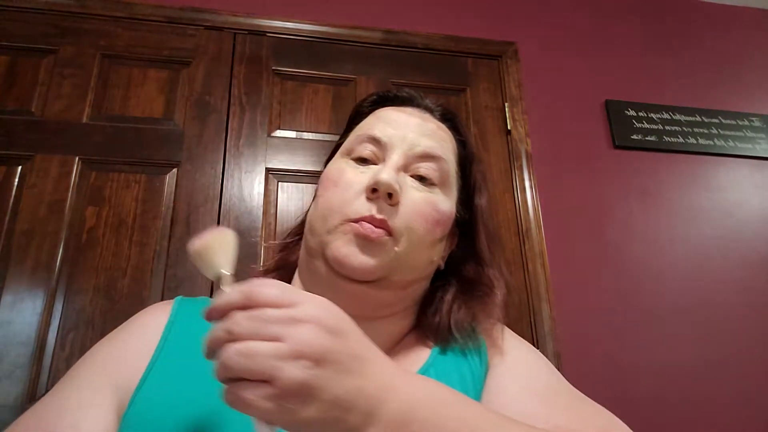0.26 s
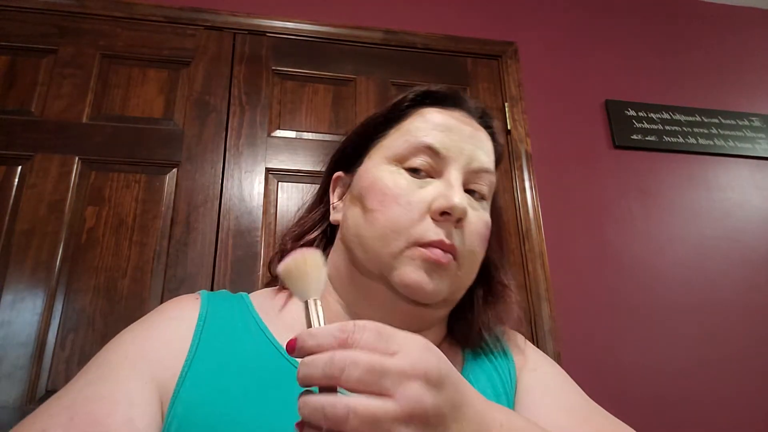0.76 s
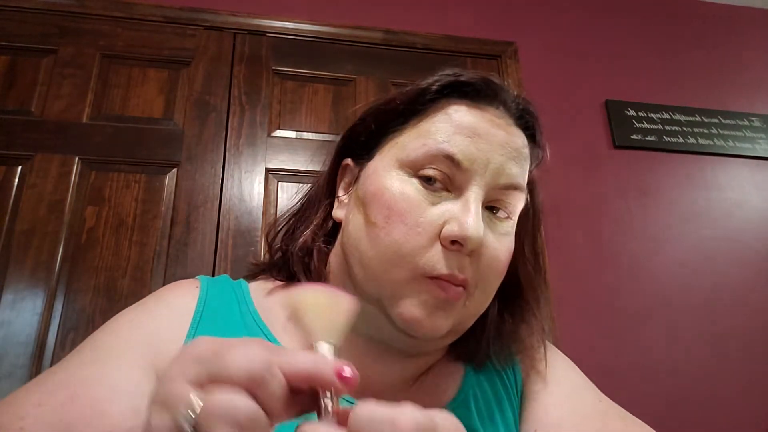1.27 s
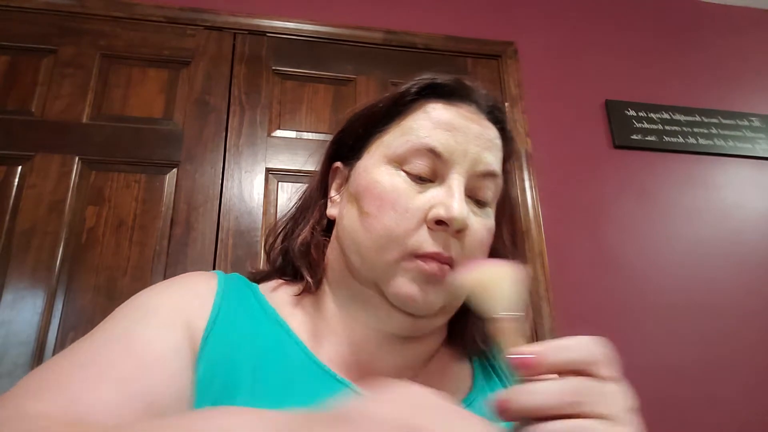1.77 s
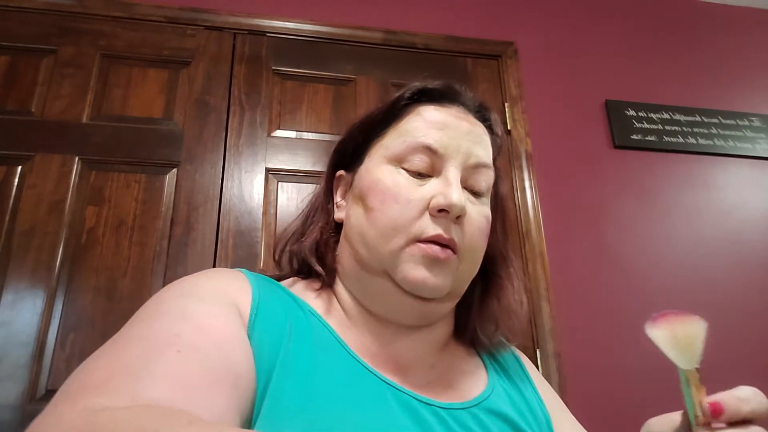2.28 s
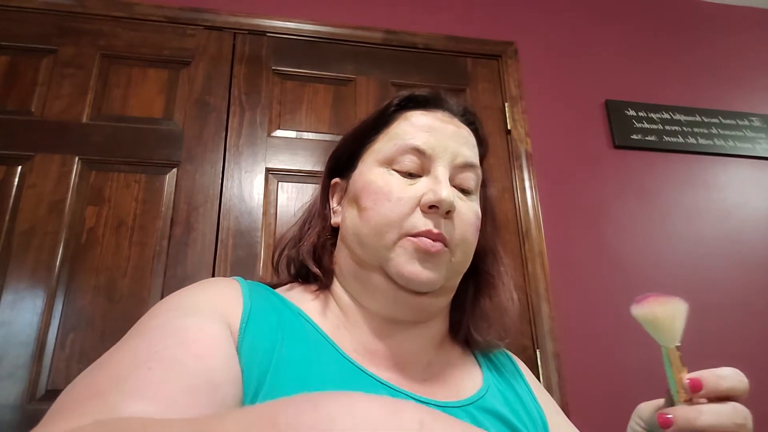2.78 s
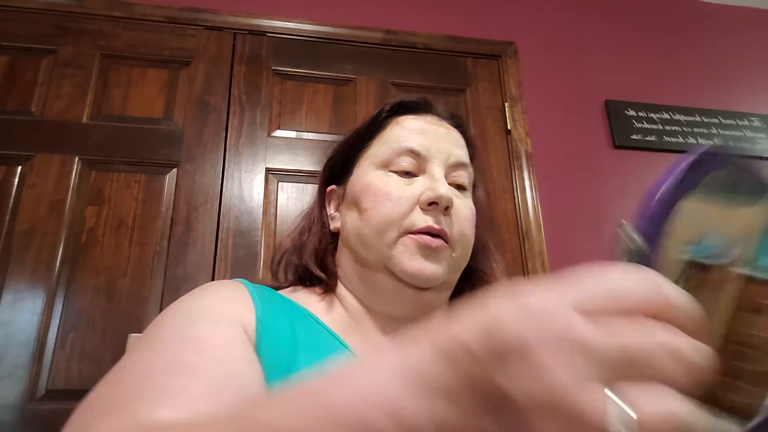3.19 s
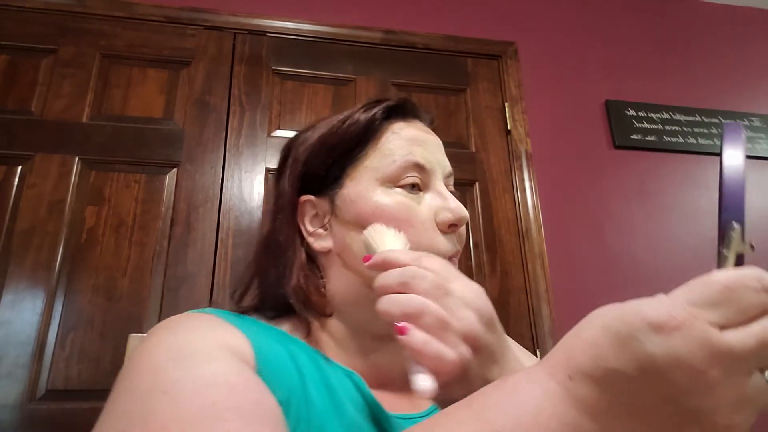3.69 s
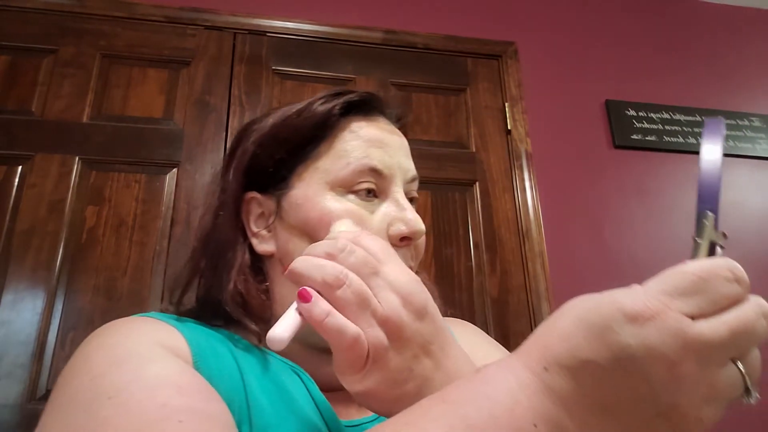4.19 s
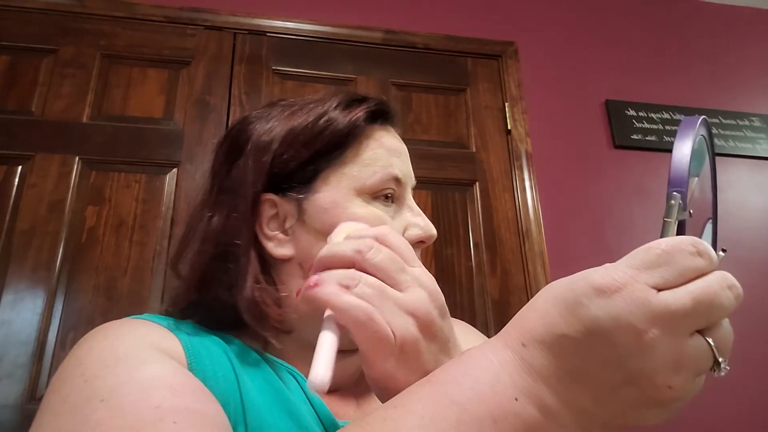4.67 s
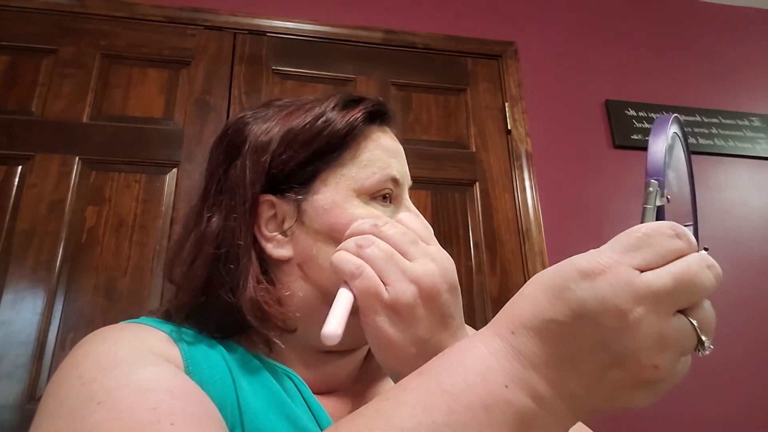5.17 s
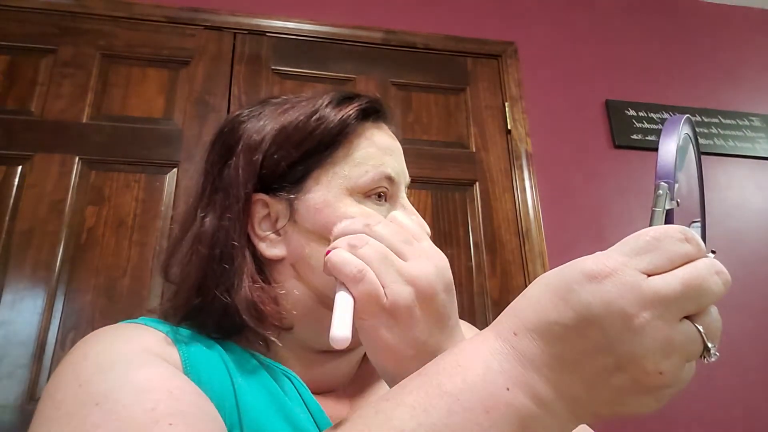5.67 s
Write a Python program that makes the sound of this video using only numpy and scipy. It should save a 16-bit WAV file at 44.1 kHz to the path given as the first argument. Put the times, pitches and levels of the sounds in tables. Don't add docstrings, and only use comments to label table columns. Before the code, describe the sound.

Small cosmetic items click and knock on wood, a hand mirror scrapes and thuds, then soft rustling remains above a low steady hum.

```python
import sys
import numpy as np
from scipy import signal
from scipy.fft import rfft, irfft, next_fast_len
from scipy.io import wavfile
from scipy.ndimage import uniform_filter1d

SR = 44100
rng = np.random.default_rng(int(sys.argv[2]) if len(sys.argv) > 2 else 0)


def undo_db(level):
    steps = np.asarray(level, float) / 20
    return 10 ** steps


def store_wav(level_fs):
    pcm = np.round(np.clip(np.atleast_2d(level_fs), -1, 1) * 32767)
    wavfile.write(sys.argv[1], SR, pcm.T.astype(np.int16))


N = 261954
CONTACT_S = 0.0013

# frequency [Hz], width [Hz], level [dB].
FRAME_MODES = [(1390, 110, 0), (1540, 130, -2), (1700, 150, -6), (2450, 130, -5), (2680, 220, -8)]


def rms_one(x):
    return x / np.sqrt(np.mean(x ** 2) + 1e-20)


def in_time(rows):
    s, *columns = np.transpose(rows)
    lasts = s[-1] > 5
    t = np.arange(N) / SR
    return [np.interp(t, s, c, left=-150, right=c[-1] if lasts else -150) for c in columns]


def at_hz(points, hz):
    points_hz, values = np.transpose(points)
    return np.interp(np.log(hz), np.log(points_hz), values)


def drift(rate_hz):
    r = np.exp(-80 * np.pi * rate_hz / SR)
    white = rng.standard_normal(N // 40 + 2002)
    slow = signal.lfilter([1], [1, -2 * r, r * r], white)[2000:]
    return np.interp(np.arange(N) / 40, np.arange(len(slow)), rms_one(slow))


def ring(clicks, hz, t60_s):
    r = undo_db(-60 / (t60_s * SR))
    w = 2 * np.pi * hz / SR
    return signal.lfilter([0, np.sin(w)], [1, -2 * r * np.cos(w), r * r], clicks + 1e-18)


def resonance(x, hz, width_hz):
    r = np.exp(-np.pi * width_hz / SR)
    zeros = (1 - r * r) / 2 * np.array([1, 0, -1])
    return signal.lfilter(zeros, [1, -2 * r * np.cos(2 * np.pi * hz / SR), r * r], x)


def butter(x, order, hz, kind="low"):
    return signal.sosfilt(signal.butter(order, hz, kind, fs=SR, output="sos"), x)


def clicks_at(times_s, sizes):
    out = np.zeros(N)
    np.add.at(out, (np.asarray(times_s) * SR).astype(int), sizes)
    return out


def grains(per_s, spread_db):
    sizes = undo_db(spread_db * np.minimum(rng.exponential(1, N), 5)) * rng.choice([-1, 1], N)
    return sizes * (rng.random(N) < per_s / SR)


def coloured(x, spectrum):
    size = next_fast_len(N)
    hz = np.arange(size // 2 + 1) * SR / size + 1
    inside = (hz > spectrum[0][0]) & (hz < spectrum[-1][0])
    gain = undo_db(at_hz(spectrum, hz)) * inside
    return rms_one(irfft(rfft(x, size) * gain, size)[..., :N])


def stereo_bands(size, likeness):
    edges_hz = 28 * 2 ** np.arange(0, 9.6, .5)
    white = rng.standard_normal((2, 2, size))
    for k, (low_hz, high_hz) in enumerate(zip(edges_hz, edges_hz[1:])):
        mid, side = butter(white[k % 2], 2, [low_hz, high_hz], "band")
        hz = np.sqrt(low_hz * high_hz)
        alike = np.clip(at_hz(likeness, hz), -1, 1)
        yield hz, np.sqrt(1 + alike) * mid + np.sqrt(1 - alike) * side * [[1], [-1]]


def hum():
    # time [s], level [dB], balance toward the upper tone [dB].
    flow_rows = [(0, -49.5, -1.5), (.3, -49.5, -5), (.55, -48, -2.5), (1, -50, -8), (1.3, -53, -5),
                 (2, -54, -2), (2.25, -47, -5), (2.65, -61, 6.5), (3.1, -48.5, -8.5), (3.4, -53, -8.5),
                 (3.85, -55, -3.5), (4.2, -50, -5.5), (4.4, -53, -6), (4.85, -45.5, -9), (5.13, -50.5, -3),
                 (5.4, -48, -3.5), (5.94, -50.5, -2)]
    # frequency [Hz], waver [Hz].
    duct_tones = [(236.5, 5), (393, 0.23)]
    # frequency [Hz], width [Hz], level [dB].
    faint_tones = [(60.6, 2.3, -77.5), (126, 1.1, -68), (156, 2.1, -74), (291.5, 2.3, -65),
                   (465, 1.2, -64.5), (780, 2.6, -68.5)]
    out = np.zeros((2, N))
    flow_db, balance_db = in_time(flow_rows)
    for (hz, waver_hz), level_db, pan_db in zip(duct_tones, [flow_db, flow_db + balance_db], [-1.2, 1.2]):
        phase = 2 * np.pi * np.cumsum(hz + waver_hz * drift(5.2)) / SR
        gain = undo_db(level_db + 2.5 + 2.7 * drift(36.0))
        out += gain * np.sin(phase) * undo_db([[pan_db], [-pan_db]])
    for hz, width_hz, level_db in faint_tones:
        out += undo_db(level_db) * rms_one(resonance(rng.standard_normal(N), hz, width_hz))
    return out


def duct():
    # frequency [Hz], density [dB per Hz].
    air_spectrum = [(25, -49.5), (50, -22), (100, -21), (180, -24.5), (300, -6.5), (450, -18),
                    (700, -22), (1000, -47.5),
                    (1500, -48), (3000, -68.5), (4200, -76), (5200, -66), (6300, -74.5), (8000, -79.5),
                       (15500, -60)]
    # frequency [Hz], left-right likeness [-1 to 1].
    air_likeness = [(60, 0.97), (130, 0.72), (290, 0.91), (640, 0.71), (1410, -1.7), (3100, 0.14),
                    (6820, -0.34), (15000, 0.96)]
    spectrum = air_spectrum
    together = drift(0.99)
    air = 0
    for hz, band in stereo_bands(N, air_likeness):
        flicker_db = (3.0 * together + 0.84 * drift(8.)) / (1 + hz / 3800.0)
        air = air + undo_db(at_hz(spectrum, hz) + flicker_db) * band
    return undo_db(-55) * rms_one(air)


def strokes():
    # start [s], length [s], level [dB], fineness [dB].
    stroke_rows = [(0, 0.86, -72.5, -3.5), (0.074, 0.092, -72.5, -6), (0.335, 0.028, -72.5, 6.5),
                   (0.54, 0.16, -71.5, -10), (0.725, 0.091, -75.5, 6.5), (0.984, 0.17, -66, -28),
                   (1.517, 0.083, -82.5, -3.5), (1.618, 0.23, -69, -8.5), (1.89, 0.44, -68.5, -11),
                   (2.46, 0.038, -45, -29), (2.569, 0.19, -50.5, -11.5), (2.811, 0.17, -52, -19),
                   (2.969, 0.24, -63, -12.5), (3.192, 0.18, -69.5, -9), (3.387, 0.074, -67.5, -5),
                   (3.479, 0.042, -72, -19), (3.525, 0.058, -76, -11), (4.061, 0.31, -81.5, -18),
                   (4.745, .2, -82, -5.5)]
    rise_s, fall_s = 0.033, 0.016
    rub_db, rub_follows = -54, 0.69
    resting = (-1, 9, -80.5, -7)
    t = np.arange(N) / SR
    power = 0
    for s, length_s, db, fine_db in [resting, *stroke_rows]:
        away = np.maximum((s - t) / rise_s, (t - s - length_s) / fall_s).clip(0)
        zones_db = [[rub_db + rub_follows * (db + 68.5)], [db], [db + fine_db]]
        power = power + np.exp(-2 * away) * undo_db(zones_db) ** 2
    return np.sqrt(power)


def dabs():
    # time [s], level [dB], length [s], centre [Hz].
    dab_rows = [(3.152, -60.5, 0.0602, 1900), (0.75, -73.5, 0.038, 900), (2.4, -52.5, 0.068, 620),
                (5.1, -76.5, 0.029, 730), (4.6, -68, 0.034, 700), (5.1, -57, 0.054, 530),
                (3.4, -75, 0.069, 690), (4.3, -51, 0.027, 390), (4.878, -54, 0.029, 434),
                (6.3, -61, 0.006, 800), (5.5, -66, 0.0042, 810), (1.83, -71.5, 0.17, 1870),
                (4.143, -78, 0.2, 1600), (6.4, -78, 0.056, 1830), (2.9, -52.5, 0.0036, 570),
                (5.55, -70.5, .3, 670)]
    t = np.arange(N) / SR
    out = np.zeros(N)
    fibres = grains(per_s=12000.0, spread_db=4.0)
    for s, level_db, length_s, hz in dab_rows:
        sound = fibres
        for _ in range(4):
            sound = resonance(sound, hz, hz)
        out += undo_db(level_db) * np.exp(-((t - s) / length_s) ** 2) * rms_one(sound)
    return out


def rustle():
    # frequency [Hz], density [dB per Hz].
    rub_spectrum = [(300, 11.5), (600, 4.5), (1000, -7.5), (1600, -12), (2600, -21), (3600, -39)]
    # frequency [Hz], density [dB per Hz].
    swish_spectrum = [(2500, -1.5), (4000, -7), (5200, 7), (6500, -2.5), (8000, -26)]
    # frequency [Hz], density [dB per Hz].
    hiss_spectrum = [(7000, -21.5), (8500, -5.5), (10500, -4), (12300, 2.5), (14000, -23), (15500, -8)]
    fibres = np.array([grains(per_s=36000.0, spread_db=4.5) for _ in "LR"])
    shared = grains(per_s=4800.0, spread_db=-0.5)
    rub_gain, swish_gain, hiss_gain = strokes()
    rub_flutter_db, swish_flutter_db, hiss_flutter_db = [1.3 * drift(15.) for _ in range(3)]
    rub = coloured(shared + 0.12 * fibres, rub_spectrum) * rub_gain * undo_db(-2.5 + rub_flutter_db)
    swish = coloured(fibres, swish_spectrum) * swish_gain * undo_db(-4.0 + swish_flutter_db)
    hiss = coloured(fibres, hiss_spectrum) * hiss_gain * undo_db(-3.5 + hiss_flutter_db)
    return rub + swish + hiss + dabs()


def knock_levels():
    case_rows = [(0.481, -44, 20.5, -12.5), (0.5197, -50.5, 15.5, -16), (0.561, -51.5, 24.5, -0.5),
                 (0.8833, -15.5, 4.5, 1.5), (0.898, -32, 3, -13), (0.9049, -7.5, -12.5, -8),
                 (.922, -23.5, -10, -16), (0.949, -25.5, 4.5, -23), (.965, -30, 2, -3),
                 (1.955, -47.5, 19.5, -8.5), (1.9751, -29, -2, -12.5), (2.088, -21, -4, -8),
                 (2.109, -35, -4, -10), (2.159, -41.5, -3, -3.5), (2.184, -48.5, 7, 2)]
    mirror_rows = [
        (2.567, -28, -1.5, -15),
        (2.589, -29, -11.5, -13),
        (2.628, -33, -3.5, -17.5),
        (2.642, -32, 0.5, -9.5),
        (2.686, -29, -10.5, -16.5),
        (2.7979, -10, -3, -2),
        (2.842, -17.5, -3, -9.5),
        (2.884, -30, 1, -3),
        (3.003, -40.5, -5, 0.5),
        (3.091, -60.5, 35, -16),
    ]
    hinge_rows = [(2.342, -42, 14.5, 5.5), (2.408, -44, 14.5, 7), (2.42, -41, 13, -9), (2.434, -38, 8, -23),
                  (2.449, -30, -24, 2), (2.545, -32, 10, 1), (2.71, -28, 1, -0.5), (3.044, -49.5, 8, 0),
                  (3.328, -50.5, -2, 1.5), (3.3707, -40, -18, 8.5), (3.427, -47, -22, -25)]
    # hollow body over case [dB], crack over edge click [dB].
    builds = [(3, -22.5), (8.5, -22), (-3.5, -11)]
    rows = []
    for table_rows, (hollow_db, crack_db) in zip((case_rows, mirror_rows, hinge_rows), builds):
        for s, db, weight_db, hard_db in table_rows:
            body_db = db + hollow_db + 0.59 * weight_db
            rows.append((s, db, db + weight_db, body_db, db + hard_db, db + hard_db + crack_db))
    return np.array(sorted(rows))


def boom(times_s, levels_db):
    hz = 130
    return resonance(ring(clicks_at(times_s, undo_db(levels_db)), hz, t60_s=.5), hz, width_hz=13)


def knocks():
    # lowest mode [Hz], highest mode [Hz], t60 [s].
    part_modes = [
        (1000, 3600, .013),
        (165, 440, .026),
        (420, 1350, .016),
        (2800, 7600, .007),
        (6500, 14000, .006),
    ]
    rows = knock_levels()
    out = np.zeros(N)
    t = np.arange(SR // 20) / SR
    luck = rng.random((len(rows), 4, len(part_modes), 8))
    for (s, *levels_db), (pitch, sign, size, wait) in zip(rows, luck):
        sound = 0
        for k, (low_hz, high_hz, t60_s) in enumerate(part_modes):
            step = (np.arange(8) + pitch[k]) / 8
            hz = low_hz * (high_hz / low_hz) ** step
            sizes = np.sin(np.pi * step) * undo_db(5 * size[k]) * np.sign(sign[k] - .4)
            since = np.maximum(t - CONTACT_S * wait[k][:, None] ** 2, 0)
            build = 1 - np.exp(-since * low_hz * 1.5)
            tones = undo_db(-60 * since / t60_s) * build * np.sin(2 * np.pi * hz[:, None] * since)
            sound = sound + undo_db(levels_db[k] - 2.5) * (sizes @ tones)
        start = int(s * SR)
        out[start:start + len(t)] += sound
    s, case_db, table_db, edge_db = rows[:, [0, 1, 2, 4]].T
    out += ring(clicks_at(s + 0.00063, undo_db(case_db - 4.0)), 1670, t60_s=0.017)
    out += ring(clicks_at(s + 0.00042, undo_db(edge_db - 2.0)), 4900, t60_s=0.009)
    return out + boom(s, table_db - 17.0)


def snaps():
    rows = knock_levels()
    level_db = (rows[:, 1] + rows[:, 4]) / 2 - 4.5 + 10.5
    impact = clicks_at(rows[:, 0] + 0.00034, undo_db(level_db))
    return butter(impact, 2, [900, 6700], "band")


def notes():
    # time [s], peak [dB], frequency [Hz], t60 [s].
    note_rows = [(0.4829, -24.5, 592, 0.029), (.5203, -37, 780, .015), (0.482, -36.5, 1300, 0.026),
                 (.5605, -43, 590, 0.019), (0.5614, -25, 240, 0.056), (0.561, -57, 11000, 0.0038),
                 (0.8924, -21.5, 2390, 0.018), (0.899, -19.5, 597, 0.021), (0.899, -17.5, 1700, 0.013),
                 (0.9056, -12, 1800, 0.017), (.9052, -15.5, 762, 0.035), (.9052, -15, 6040, 0.0084),
                 (0.9075, -33, 11800, .005), (0.914, -17.5, 2440, 0.031), (0.9146, -26, 3060, .02),
                 (0.964, -32.5, 5070, 0.0065), (1.9565, -46, 380, 0.042), (1.974, -40.5, 476, 0.041),
                 (1.982, -35, 903, 0.054), (2.088, -24, 1905, 0.051), (2.088, -30, 870, 0.043),
                 (2.0879, -30.5, 1224, 0.07), (2.094, -29, 2530, 0.028), (2.097, -34, 5260, 0.019),
                 (2.106, -28, 758, 0.051), (2.158, -47, 10600, 0.0053), (2.159, -54, 4500, 0.011),
                 (2.3408, -38, 1500, 0.072), (2.3415, -36.5, 4700, 0.039), (2.7967, -12.5, 410, 0.043),
                 (2.798, -9, 1584, 0.026), (2.799, -18, 2970, 0.02), (2.803, -20.5, 902, .05),
                 (2.843, -18.5, 2515, 0.022), (2.845, -17, 1458, 0.037), (2.866, -29, 1490, 0.035),
                 (3.327, -48, 3000, 0.024), (3.371, -40.5, 5400, 0.034), (3.3697, -37.5, 6990, 0.018),
                 (3.3712, -54, 9800, 0.031), (3.3716, -50, 11970, 0.051), (3.371, -46.5, 2475, 0.051),
                 (3.426, -48, 2300, 0.015), (4.366, -54.5, 700, 0.028), (4.853, -45, 646, 0.021),
                 (2.7968, -13.5, 3440, 0.0088), (2.803, -17.5, 4770, 0.018), (2.797, -20, 211, 0.07),
                 (.9055, -21, 4100, .008), (0.894, -30, 5570, .012), (2.0995, -34, 560, 0.04),
                 (2.111, -30.5, 1325, 0.031),
                 (0.893, -25, 4000, 0.0066), (.948, -51, 12160, 0.01), (.9235, -40, 11800, 0.0067),
                 (.9235, -37.5, 8500, 0.0054), (.966, -47, 9400, 0.0055), (2.41, -42, 6300, .008),
                 (2.421, -48, 8500, .006), (2.46, -36, 7100, .01), (2.571, -35, 5700, 0.046),
                 (2.576, -42, 10600, 0.0061), (2.589, -49, 8500, .006), (2.648, -43, 7466, 0.0052),
                 (2.647, -35, 4020, 0.0069), (2.72, -42, 5500, .01), (2.72, -33, 11500, .008),
                 (3.043, -54, 11500, 0.0046), (3.13, -58, 4700, 0.046), (3.21, -63, 4780, 0.033),
                 (3.21, -57, 6800, .02), (2.685, -23, 1000, .015), (3.095, -35, 280, 0.032),
                 (.9065, -20, 1616, 0.023), (.907, -36, 12590, .012), (2.0885, -46, 11600, .02),
                 (2.0885, -46.5, 9000, 0.015), (3.372, -47, 4300, .02)]
    return sum(ring(clicks_at([s], [undo_db(db)]), hz, t60_s) for s, db, hz, t60_s in note_rows)


def bumps():
    # time [s], peak [dB], frequency [Hz].
    bump_rows = [(0.561, -22, 184), (0.887, -30, 83.4), (0.903, -49, 167.7), (1.957, -28, 126),
                 (0.616, -40, 62), (2.236, -46.5, 95), (2.454, -34, 62), (2.64, -33, 87),
                 (2.901, -32, 90.6), (2.437, -51, 199), (2.796, -52, 196.7), (3.091, -41, 131.8),
                 (3.16, -36, 138.6), (3.393, -38, 150.2), (3.719, -49.5, 108.5), (4.101, -32.5, 119.8),
                 (4.155, -32, 100.3), (4.271, -51.5, 88), (4.758, -59.5, 199.5), (4.878, -42.5, 156)]
    out = np.zeros(N)
    for s, peak_db, hz in bump_rows:
        out += ring(clicks_at([s], [undo_db(peak_db - 3.0)]), hz, 5.3 / hz)
    s, peak_db, hz = np.transpose(bump_rows)
    out += boom(s, peak_db - 16.5 - 0.027 * (hz - 130))
    softened = signal.lfilter([.05], [1, -.95], out)
    return signal.lfilter([.07], [1, -.93], softened)


def pings():
    # time [s], peak [dB].
    ping_rows = [
        (2.3404, -31.5),
        (2.41, -47.5),
        (2.45, -28.5),
        (2.547, -40),
        (2.575, -44),
        (2.712, -30),
        (2.799, -45),
        (3.3714, -46.5),
    ]
    s, peak_db = np.transpose(ping_rows)
    return ring(clicks_at(s, undo_db(peak_db - 5.5)), 13280, t60_s=.04)


def drag():
    # time [s], pressure [dB], speed [dB].
    drag_rows = [
        (2.38, -50.5, 2.5),
        (2.426, -44.5, 7.5),
        (2.452, -44, 4),
        (2.475, -46, 4.5),
        (2.55, -43.5, 4.5),
        (2.578, -28.5, 5),
        (2.63, -31.5, 0.5),
        (2.74, -35.5, 1.5),
        (2.79, -49.5, -4.5),
    ]
    # frequency [Hz], width [Hz], level [dB].
    board_modes = [(247, 8.3, 9.5), (120, 3, -0.5), (340, 30, -30)]
    # frequency [Hz], width [Hz], level [dB].
    handle_modes = [(481, 31.3, -12), (700, 150, 0), (805, 67, -20), (1034, 26, -3)]
    # level over pressure [dB], share of the speed.
    shaken = [(-4, -0.86), (4, 0), (-5.5, 2.5), (-19, 3.5)]
    grit_spectrum = [(900, 1), (2000, 3.5), (3000, 6.0), (5000, -1.5), (6500, -6.5), (8000, -16.5),
                     (10000, -21), (12500, -19), (14000, -41)]
    slips = grains(per_s=2600., spread_db=4.) * undo_db(3.5 * drift(70.))
    sounds = []
    for modes in (board_modes, handle_modes, FRAME_MODES):
        body = 0
        for k, (hz, width_hz, db) in enumerate(modes):
            mode = resonance(resonance(slips, hz, 2 * width_hz), hz, 2 * width_hz)
            body = body + (-1) ** k * undo_db(db) * mode / np.sqrt(width_hz)
        sounds.append(body)
    sounds.append(coloured(slips, grit_spectrum))
    pressure_db, speed_db = in_time(drag_rows)
    speed_db = np.clip(speed_db, -20, 20)
    out = 0
    for (db, share), sound in zip(shaken, sounds):
        gain = undo_db(pressure_db + db - 5.5 + share * speed_db)
        out = out + uniform_filter1d(gain, size=400) * rms_one(sound)
    return out


def rocks():
    # time [s], level [dB], length [s].
    rock_rows = [
        (2.391, -33.5, 0.0062),
        (2.449, -27.5, 0.0094),
        (2.48, -36.5, 0.0067),
        (2.528, -36.5, 0.0087),
        (2.582, -21.5, 0.016),
        (2.63, -34, 0.026),
        (2.769, -29, 0.016),
        (2.846, -20, 0.0045),
        (2.87, -51, 0.0056),
    ]
    # time [s], level [dB], length [s], frequency [Hz].
    catch_rows = [(2.405, -39.5, 0.0073, 1547), (2.423, -38.5, .008, 2487), (2.426, -32.5, 0.0064, 1398),
                  (2.439, -28, 0.0079, 1511), (2.457, -35, 0.0059, 1453), (2.499, -35, .005, 1446),
                  (2.515, -42.5, .01, 2575), (2.558, -28, 0.01, 1407), (2.57, -28, 0.0041, 2466),
                  (2.576, -27.5, 0.0062, 1384), (2.591, -22, 0.0053, 1516), (2.592, -28.5, 0.0079, 1044),
                  (2.594, -30, .008, 2489), (2.608, -24, .012, 697.4), (2.609, -30.5, 0.0055, 2484),
                  (2.611, -31, .01, 1646), (2.656, -32.5, 0.0097, 1390), (2.686, -26, 0.0058, 714),
                  (2.692, -31, 0.027, 1438), (2.692, -34, 0.0119, 2400), (2.716, -32, 0.0074, 1549),
                  (2.854, -17.5, 0.0037, 330), (2.823, -36, 0.015, 870), (2.7981, -9, 0.00077, 390),
                  (3.108, -51, .014, 1980), (3.15, -55, .01, 1900), (3.185, -53.5, 0.014, 2500),
                  (2.61, -37.5, 0.0147, 1100), (2.575, -37.5, 0.0089, 460), (3.2, -48.5, 0.017, 326),
                  (3.13, -51, 0.011, 494), (2.935, -52, 0.01, 501), (2.767, -38.5, 0.0049, 2190),
                  (2.768, -34.5, 0.0054, 1670), (2.745, -35.5, 0.012, 745.6)]
    out = np.zeros(N)
    t = np.arange(-SR // 10, SR // 10) / SR
    for s, db, length_s, hz in [(*row, 269) for row in rock_rows] + catch_rows:
        start = int(s * SR) - SR // 10
        out[start:start + len(t)] += undo_db(db) * np.exp(-(t / length_s) ** 2) * np.sin(2 * np.pi * hz * t)
    return out


def skips():
    # time [s], peak [dB], brightness [dB].
    skip_rows = [(2.401, -36.5, -8.5), (2.411, -34, -4), (2.4146, -31, -7), (2.435, -27, -14),
                 (2.463, -33, -2.5), (2.486, -36, -7.5), (2.499, -32, -8), (2.512, -36.5, -8),
                 (2.544, -29, -3.5), (2.566, -25, -8), (2.572, -28, -4.5), (2.589, -23.5, -9),
                 (2.598, -28, -9), (2.606, -28, -6.5), (2.628, -31.5, -5.5), (2.648, -29.5, -4.5),
                 (2.673, -33.5, -8.5), (2.6858, -28.5, -11.5), (2.69, -27.5, -11), (2.7087, -26, -3),
                 (2.719, -32, -3), (2.731, -35.5, -4), (2.7635, -34, -8), (2.84, -22, -9.5),
                 (2.856, -26.5, -6.5)]
    s, db, bright_db = np.transpose(skip_rows)
    strikes = clicks_at(s, undo_db(db))
    body = 0
    for k, (hz, width_hz, level_db) in enumerate(FRAME_MODES):
        damped = resonance(strikes, hz, 2.1 * width_hz)
        body = body + (-1) ** k * undo_db(level_db + 23.5) * damped
    speck = 2.5 * resonance(clicks_at(s, undo_db(db + bright_db)), 5600., 3500.)
    return butter(body + speck, 4, 7000.)


def evened(band, hz):
    mean = np.mean(band ** 2)
    local = uniform_filter1d(band ** 2, size=int(5 * SR / hz) + 1)
    return band / (local + .1 * mean) ** .4 * mean ** .4


def room(x):
    # frequency [Hz], t60 [s].
    tail_t60 = [(60, 0.97), (130, 0.4), (300, 0.37), (1000, 0.51), (3000, 0.57), (4500, 0.38), (6500, 0.38),
                (9000, 0.42), (14000, 0.5)]
    # frequency [Hz], level [dB].
    tail_tone = [(60, -5), (130, 4), (300, 11), (600, 5), (1100, -2), (1800, -0.5), (2800, 0), (6000, -4),
                 (10000, -1), (17000, -18.5)]
    # frequency [Hz], left-right likeness of the echoes [-1 to 1].
    tail_likeness = [(60, .93), (130, .9), (300, 0.73), (650, 0.64), (1400, -.1), (3000, 0), (15000, 0)]
    first_wall_s, early_share = 0.0075, 0.1
    t = np.arange(SR) / SR
    echoes = 0
    for hz, band in stereo_bands(SR, tail_likeness):
        level_db = at_hz(tail_tone, hz) - 60 * t / at_hz(tail_t60, hz)
        echoes = echoes + undo_db(level_db) * evened(band, hz)
    clumps = undo_db(1.5 * drift(250.)[:SR] * np.exp(-t / .03))
    onset = np.clip((t - first_wall_s) / 0.00045, early_share * (t > CONTACT_S), 1)
    echoes = echoes * clumps * onset
    echoes = echoes / np.sqrt(np.sum(echoes ** 2) / 2)
    return undo_db(-7) * signal.fftconvolve(x[None], echoes, axes=1)[:, :N]


def late(x, samples):
    return np.interp(np.arange(N) - samples, np.arange(N), x)


def scene():
    # time [s], level [dB].
    boom_rows = [
        (.565, -44.5),
        (0.908, -34),
        (1.961, -33.5),
        (2.09, -43),
        (2.17, -44),
        (2.8, -31),
        (2.958, -42),
        (3.101, -45),
    ]
    stand_echoes = [(39, -0.13), (64, -0.13)]
    pin, struck, snap = pings(), notes(), snaps()
    table = knocks() + struck + pin + bumps() + drag() + rocks() + skips()
    table = butter(table + boom(*np.transpose(boom_rows)) + 0.13 * snap, 6, 14200)
    shaking = butter(table, 2, 350.)
    left = late(table, 2.5) * undo_db(1.5) + .45 * shaking
    right = table * undo_db(-1.5) - .1 * shaking
    treble = signal.filtfilt(*signal.butter(4, 7000, "high", fs=SR), table)
    left += (late(treble, 1) - late(treble, 2.5)) * undo_db(1.5)
    direct = np.array([left, right])
    direct = direct + [gain * late(table, samples) for samples, gain in stand_echoes]
    into_room = table + .3 * pin - .4 * struck + snap
    echoes = room(into_room) * undo_db([[1.2], [-1.2]])
    air = hum() + duct()
    return direct + echoes + rustle() + [late(air[0], 7.0), air[1]]


def port(x, shape):
    for hz, width_hz, db in shape:
        x = x + (undo_db(db) - 1) * resonance(x, hz, width_hz)
    return x


def low_pass(x):
    return signal.sosfilt(signal.butter(12, 15720, fs=SR, output="sos"), x)


def record(dry):
    # frequency [Hz], width [Hz], gain [dB].
    left_port = [(700, 2900, 0), (4900, 1900, -12), (12500, 13000, 3)]
    # frequency [Hz], width [Hz], gain [dB].
    right_port = [(700, 1500, -3.5), (4700, 3100, 9), (10000, 4500, 0)]
    x = np.array([port(dry[0], left_port), port(dry[1], right_port)])
    x = butter(x, 2, 66., "high")
    x = 1.3 * np.tanh(x / 1.3)
    x = signal.sosfilt(signal.cheby2(10, 60, 16300, fs=SR, output="sos"), x)
    return low_pass(x)


dry = scene()
out = record(dry)
store_wav(out)
```